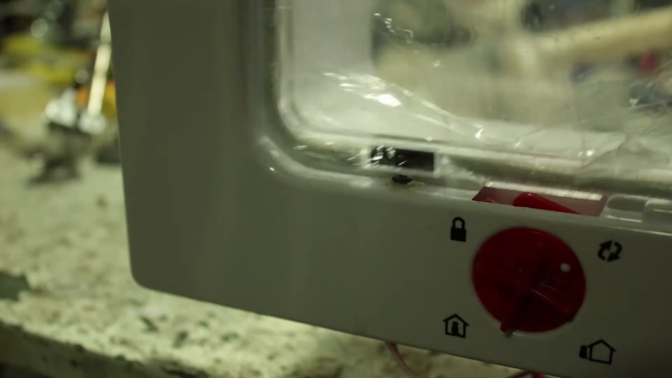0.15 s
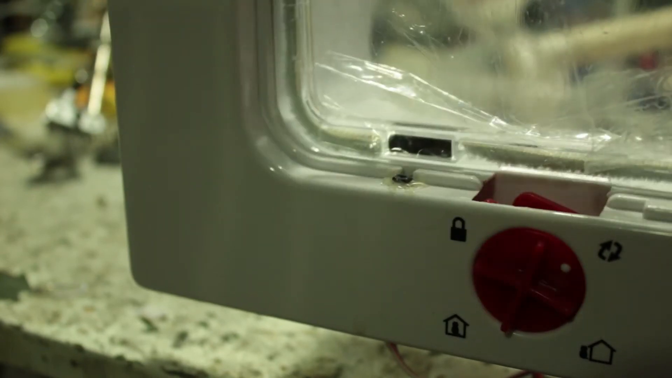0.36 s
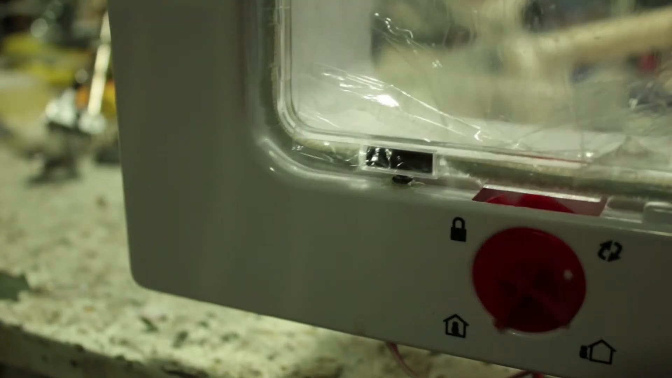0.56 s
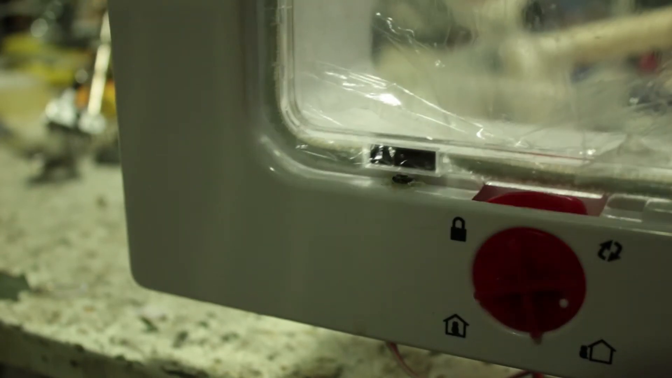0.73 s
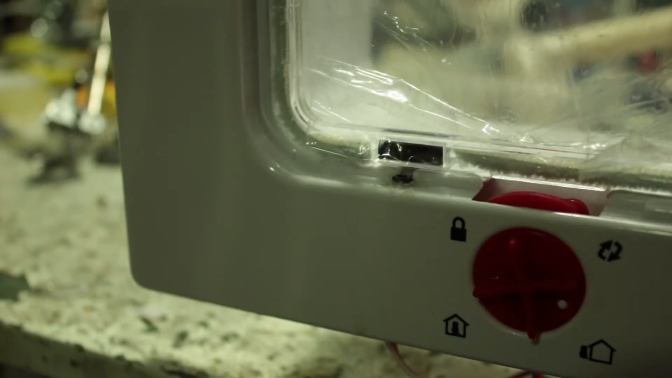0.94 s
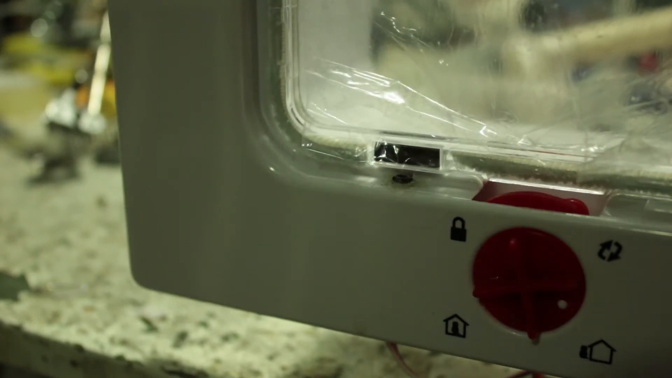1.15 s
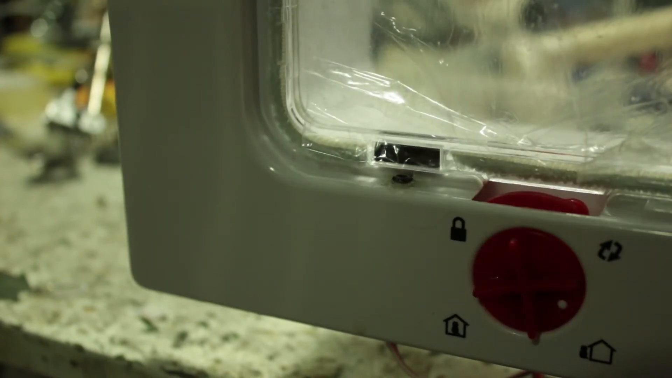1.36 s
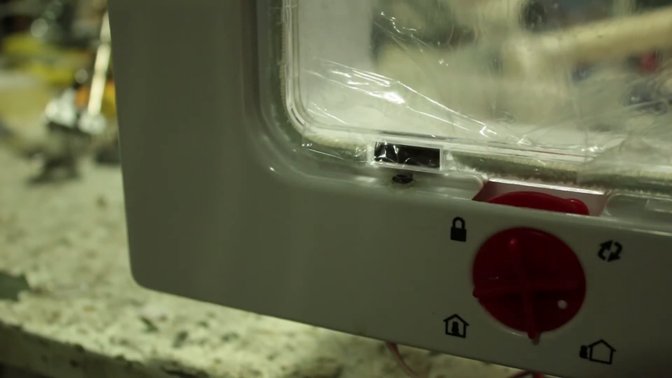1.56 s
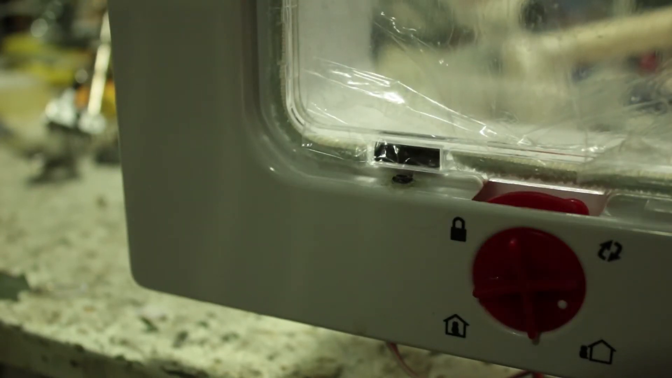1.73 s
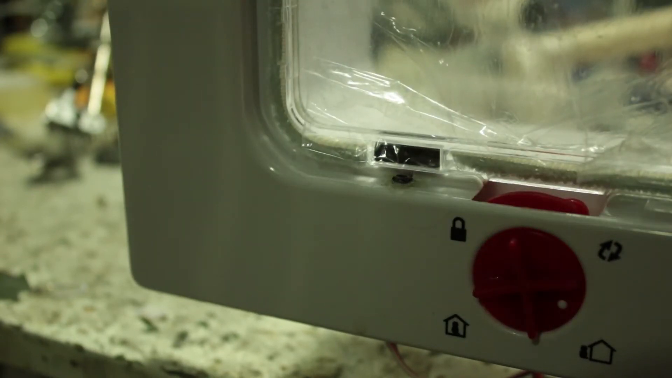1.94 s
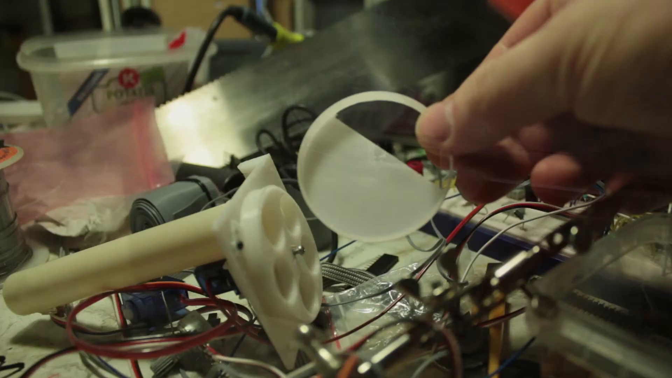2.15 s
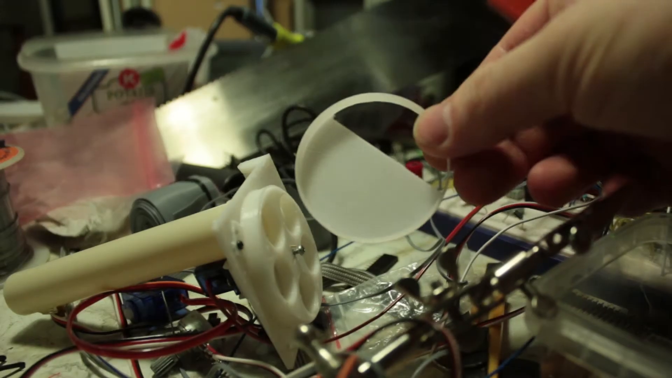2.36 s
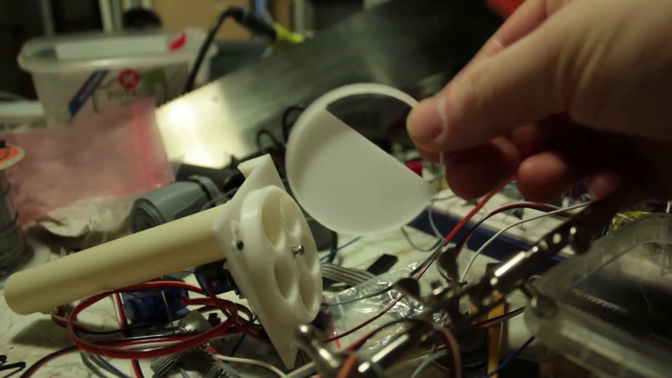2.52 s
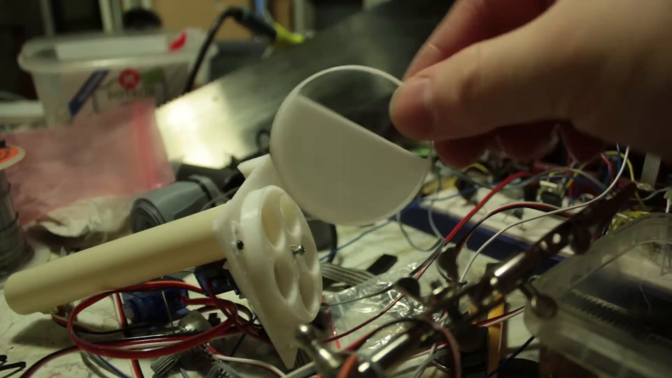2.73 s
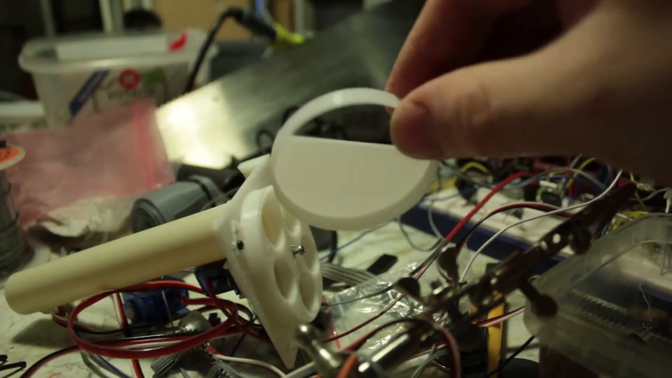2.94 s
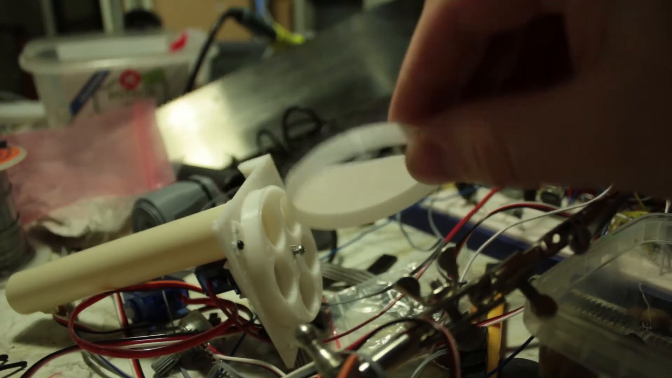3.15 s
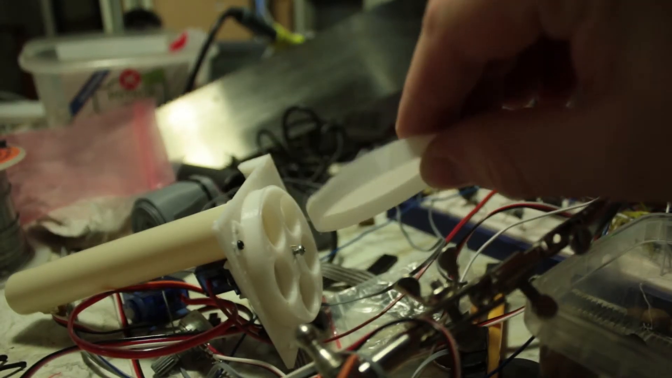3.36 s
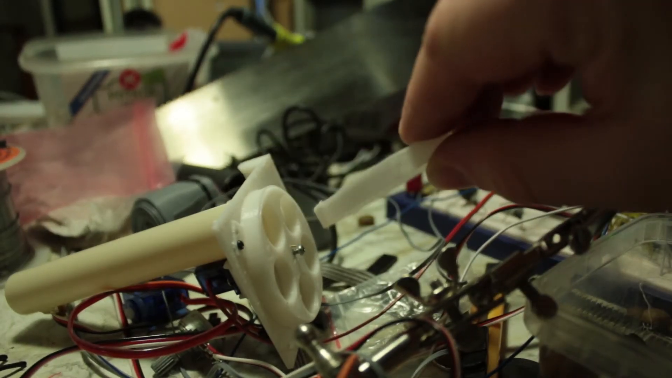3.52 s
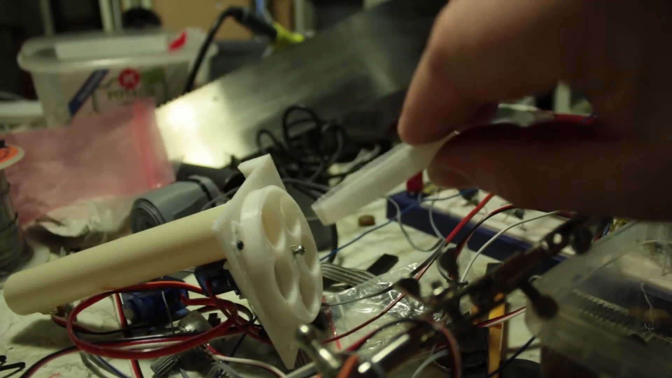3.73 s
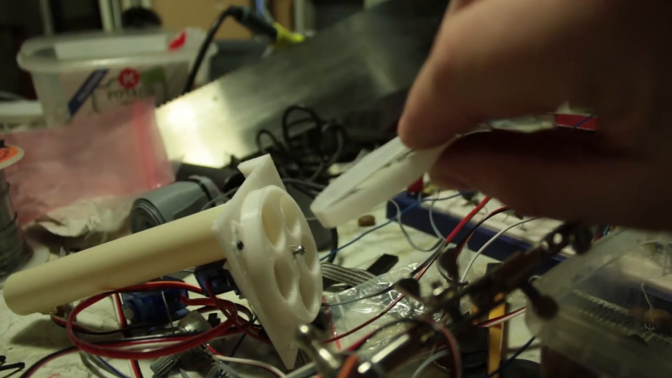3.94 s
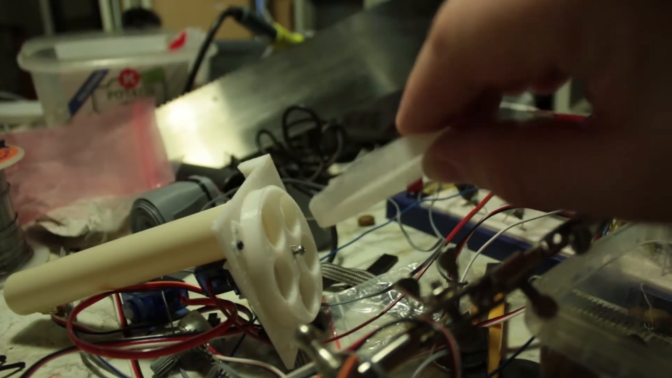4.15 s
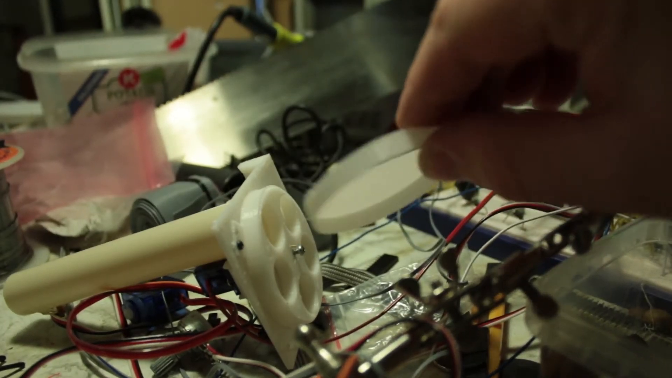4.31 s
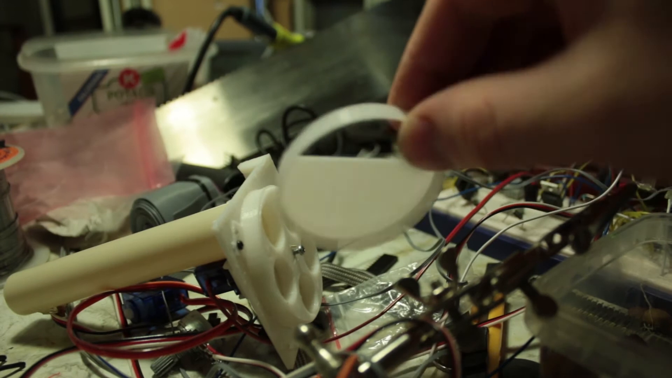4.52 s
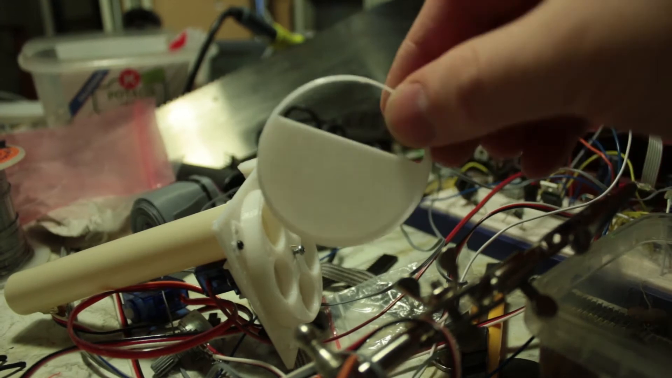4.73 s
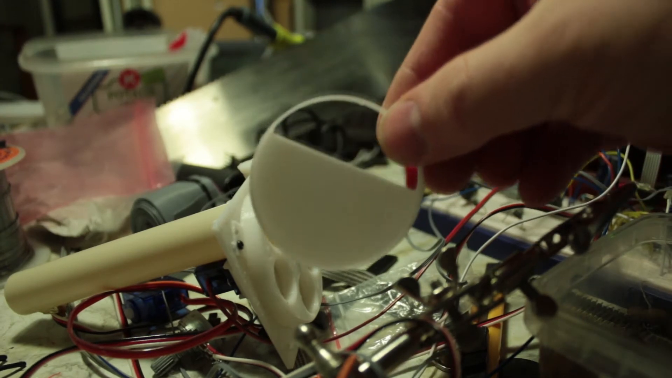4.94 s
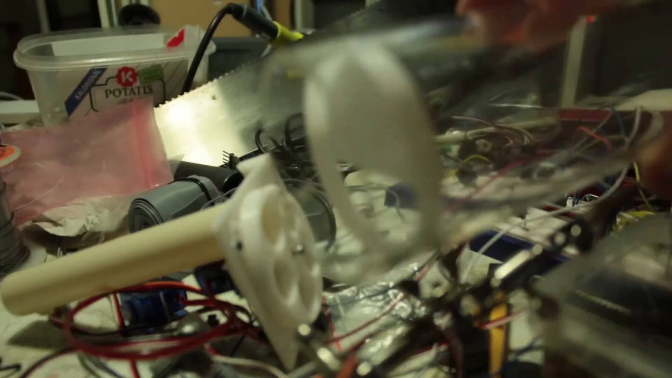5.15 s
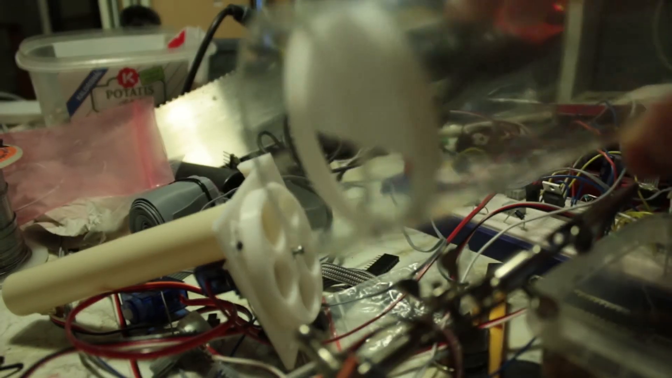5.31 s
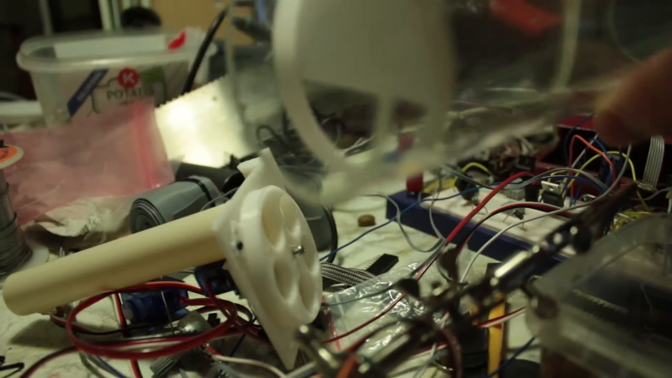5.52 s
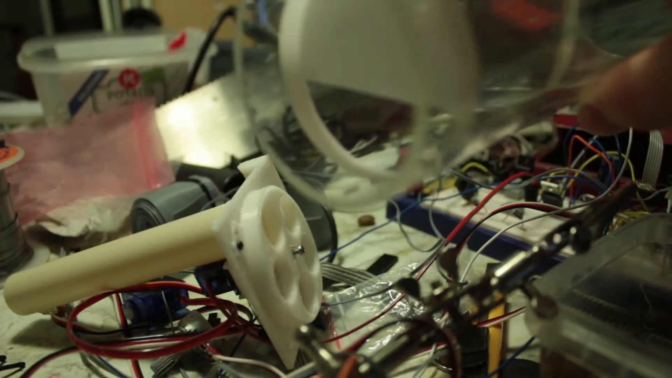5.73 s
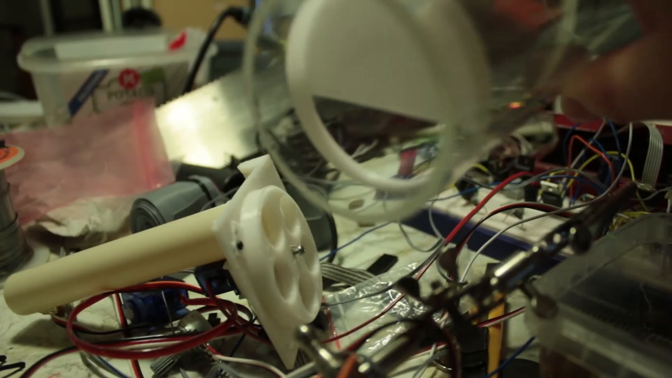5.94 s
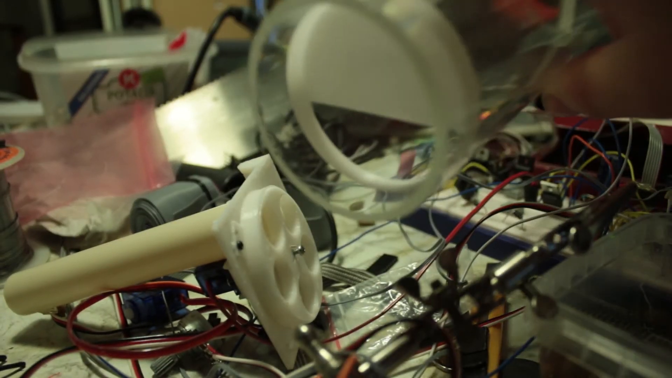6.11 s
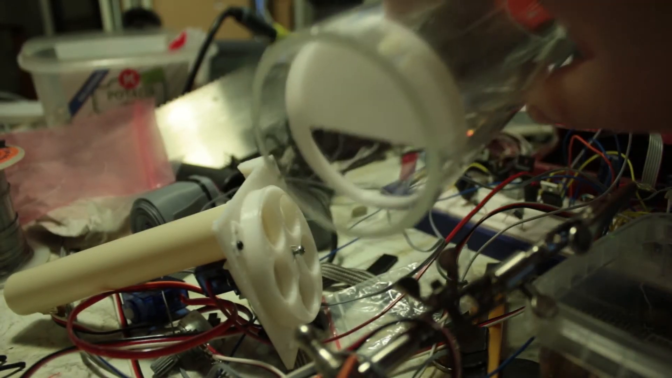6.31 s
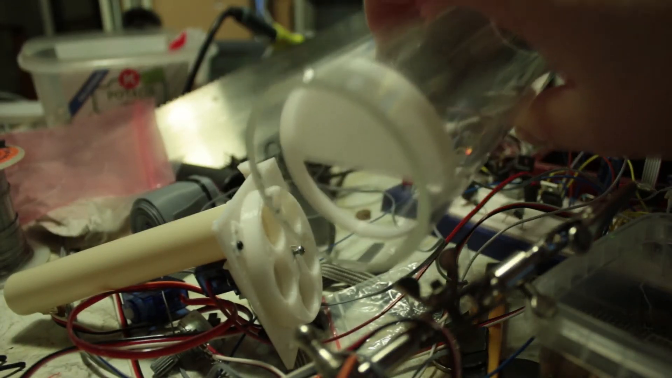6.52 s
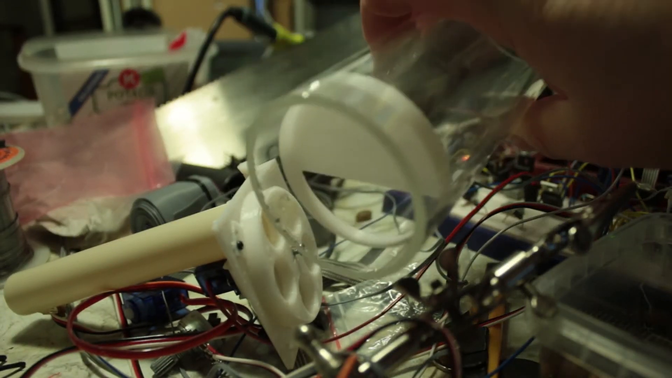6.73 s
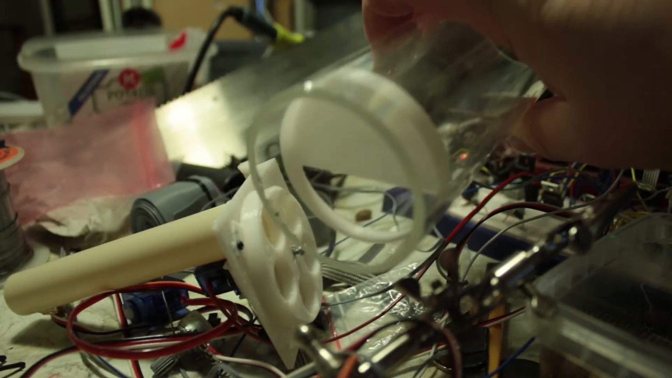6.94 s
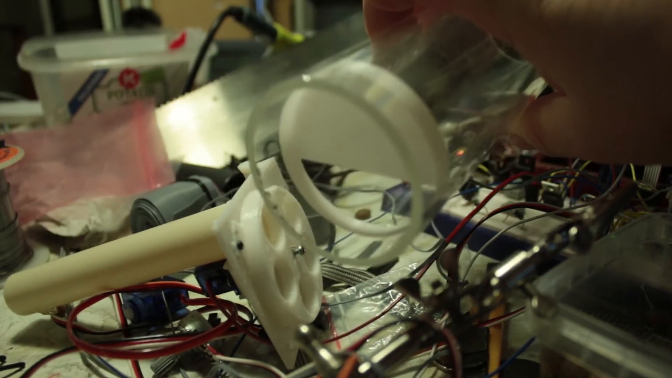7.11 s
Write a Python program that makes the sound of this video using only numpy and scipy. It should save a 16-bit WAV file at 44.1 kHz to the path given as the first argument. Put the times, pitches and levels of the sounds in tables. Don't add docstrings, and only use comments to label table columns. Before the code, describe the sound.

Very close to the microphone, a tiny servo whirs in a short burst, pauses, then revs again and drives a plastic latch into its stop with sharp clacks. Quiet humming room follows. After two seconds the camera's focus motor chatters in short dry rattles, with soft body thuds and light knocks, ending sparsely over faint hiss.

```python
import sys
import numpy as np
from scipy import signal
from scipy.fft import rfft, irfft, next_fast_len
from scipy.io import wavfile
from scipy.ndimage import uniform_filter1d

SR = 44100
rng = np.random.default_rng(int(sys.argv[2]) if len(sys.argv) > 2 else 0)


def dump_mix(stems):
    frames = np.atleast_2d(stems).T
    limited = np.clip(frames, -1, 1)
    pcm = np.round(limited * 32767).astype(np.int16)
    wavfile.write(sys.argv[1], SR, pcm)


def gain_from_db(level_db):
    decades = np.asarray(level_db, float) / 20
    return 10 ** decades


N = 320594
T = np.arange(N) / SR
GRID = np.arange(0, N / SR, 1 / 1000)
LONG = next_fast_len(N + 4096)
MOVE_S = 2.2

# frequency in Hz, width in Hz, level in dB.
HOUSING_MODES = [(952, 755, -12.5), (1850, 490, -5.5), (2313, 610, -6.5), (2858, 465, 3.5), (3098, 460, 3),
                 (3650, 250, -5), (4670, 1240, -20.5)]


def evened(x):
    return x / np.sqrt(np.mean(x ** 2) + 1e-20)


def read(points, hz):
    f, value = np.transpose(points)
    return np.interp(np.log(hz + 1), np.log(f + 1), value)


def add(mix, s, sound):
    part = mix[round(s * SR):][:len(sound)]
    part += sound[:len(part)]


def wander(size):
    return evened(uniform_filter1d(uniform_filter1d(rng.standard_normal(N), size), size))


def coloured(x, points):
    gain = gain_from_db(read(points, np.fft.rfftfreq(LONG, 1 / SR)))
    return evened(irfft(rfft(x, LONG) * gain, LONG)[..., :N])


def resonate(x, hz, width):
    r = np.exp(-np.pi * width / SR)
    return 2 * signal.lfilter([1 - r], [1, -r * np.exp(2j * np.pi * hz / SR)], x).real


def body(x, modes):
    return sum((-1) ** k * gain_from_db(db) * resonate(x, hz, w) for k, (hz, w, db) in enumerate(modes))


def housing(x, tint_db):
    out = 0
    for k, (hz, width, db) in enumerate(HOUSING_MODES):
        once = resonate(gain_from_db(db + tint_db[k]) * x, hz, width)
        out = out + (-1) ** k * resonate(once, hz, width)
    return out


def bursts(events):
    out, t = np.zeros(N), T[:SR // 8]
    for s, db, t60 in events:
        add(out, s, gain_from_db(db - 60 * t / t60) * np.minimum(t / 0.0012, 1))
    return out


def swells(rows, lift_db, fall_db_per_s):
    s, rise, hold, db = np.transpose(rows)[:4]
    age, rise = GRID[:, None] - s, np.maximum(rise, 1 / 500)
    level = db - lift_db * np.clip(1 - age / rise, 0, 1)
    level = level - 4000 * np.maximum(-age, 0)
    level = level - fall_db_per_s * np.maximum(age - rise - abs(hold), 0)
    lead, ticks = level.argmax(axis=1), np.arange(len(GRID))
    level_db = np.maximum(level[ticks, lead], -120)
    return np.interp(T, GRID, level_db), lead, age[ticks, lead]


def columns(tables):
    rows = []
    for table in tables:
        first, last = table[0], table[-1]
        rows += [(first[0] - 0.002, -120, *first[2:]), *table, (last[0] + 0.00071, -120, *last[2:])]
    s, *controls = np.transpose(rows)
    return [np.interp(T, s, c) for c in controls]


def ports(x, lag_s, lean):
    # frequency in Hz, share both microphones get alike.
    likeness = [(600, 1), (1500, 0.84), (3000, 0.63), (6000, 0.36)]
    hz = np.fft.rfftfreq(LONG, 1 / SR)
    first, other = rfft(x, LONG)
    share = np.clip(read(likeness, hz), 0, 1)
    half = np.exp(-1j * np.pi * hz * lag_s) * gain_from_db(read(lean, hz) / 2)
    pair = np.array([first * half, (share * first + np.sqrt(1 - share ** 2) * other) / half])
    return irfft(pair, LONG)[:, :N]


def room(x):
    # frequency in Hz, t60 in seconds.
    decay = [(200, 0.17), (1500, 0.11), (5000, 0.28), (12000, 0.069)]
    hz, t, z = signal.stft(rng.standard_normal((2, SR // 2)), SR, nperseg=128)
    tail = signal.istft(z * gain_from_db(-60 * t / read(decay, hz)[:, None]), SR, nperseg=128)[1]
    return signal.fftconvolve(x[None], tail / np.linalg.norm(tail[0]), axes=1)[:, :N]


def air():
    # frequency in Hz, level in dB.
    first_place = [(35, -52), (60, -15), (91, -14.5), (124, -3), (146, -8.5), (346, -10.5), (389, -10.5),
                   (480, -12.5), (553, -8.5), (784, -15.5), (1140, -13.5), (1340, -20), (1440, -17.5),
                   (16000, -29)]
    second_place = [(35, -29), (60, -11.5), (127, -6.5), (149, -3.5), (238, -4.5), (330, -7.5), (579, -8.5),
                    (698, -11), (1010, -11.5), (1110, -14.5), (1340, -14), (1470, -16), (6730, -21.5),
                    (16000, -29)]
    # frequency in Hz, left-right likeness.
    air_likeness = [(60, 0.54), (180, 0.74), (550, 0.53), (1650, 0.066), (4970, -0.19), (15000, -0.66)]
    # frequency in Hz, level in the first place in dB, in the second in dB.
    hum_tones = [(49.3, -73, -73), (124, -86, -93), (192, -73.5, -69), (243.5, -80, -72), (299, -96, -72.5)]
    second = np.clip((T - MOVE_S) / 0.27 + 0.5, 0, 1)
    hz = np.fft.rfftfreq(LONG, 1 / SR)
    same = np.clip(read(air_likeness, hz), 0, 1)
    out = np.zeros((2, N))
    for colour, db, share in ((first_place, -56.5, 1 - second), (second_place, -56, second)):
        both, left, right = rfft(rng.standard_normal((3, LONG)))
        pair = np.sqrt(same) * both + np.sqrt(1 - same) * np.array([left, right])
        noise = irfft(pair * gain_from_db(read(colour, hz)), LONG)[:, :N]
        out += gain_from_db(db - 2.0) * np.sqrt(share) * noise / np.std(noise.mean(0))
    for f, a_db, b_db in hum_tones:
        level_db = a_db + (b_db - a_db) * second + 2.0 * wander(size=3000)
        out += np.sqrt(2) * gain_from_db(level_db) * np.sin(2 * np.pi * (f * T + rng.random()))
    beat = np.exp(2.0 * (np.cos(2 * np.pi * 8.68 * (T - 1.04)) - 1))
    throb_hz = 530 + 45 * beat + 5 * wander(size=500)
    throb = evened((0.5 + beat) * np.sin(2 * np.pi * np.cumsum(throb_hz) / SR))
    return out + gain_from_db(-64.5) * (1 - second) * throb


def knocks():
    # start in seconds, peak in dB, frequency in Hz, t60 in seconds.
    knock_events = [(0.032, -39, 173, 0.38), (.06, -41, 590, 0.099), (.05, -47, 376, 0.27),
                    (0.249, -49.5, 167, 0.24), (0.545, -32.5, 329.5, 0.07), (.55, -40.5, 381, 0.17),
                    (.545, -42, 713, 0.17), (0.547, -43.5, 167.9, 0.27), (0.812, -40.5, 166, 0.5),
                    (.81, -37.5, 312, 0.12), (0.93, -51, 3620, 0.079), (4.001, -46, 165, 0.28),
                    (4.408, -36, 184.6, 0.22), (4.408, -37.5, 282, 0.14), (5.137, -41.5, 616, 0.13),
                    (5.155, -54, 420, 0.6), (5.137, -66.5, 1850, 0.89), (5.247, -35, 167.4, 0.16),
                    (5.621, -48, 184, 0.14), (5.921, -50, 183, 0.6), (6.21, -52, 573, 0.028),
                    (6.704, -42, 460, 0.036)]
    out, t = np.zeros(N), T[:SR // 2]
    for s, db, hz, t60 in knock_events:
        blur = np.clip(hz / 1200, 0, 1)
        width = 0.41 * hz
        cluster = evened(resonate(resonate(rng.standard_normal(len(t)), hz, width), hz, width))
        ring = (1 - blur) * np.sin(2 * np.pi * hz * t) + 1.9 * blur * cluster
        add(out, s, gain_from_db(db - 60 * t / t60) * np.minimum(t / 0.0011, 1) * ring)
    return out


def slide():
    # start in seconds, rise in seconds, hold in seconds, level in dB.
    hand_strokes = [
        (1.95, 0.042, 0.056, -46),
    ]
    # frequency in Hz, level in dB per Hz.
    friction = [(470, -37), (800, -12), (1460, -8), (1880, -1), (2050, -2.5), (4570, -1), (9330, -2),
                (16000, -16)]
    level_db = swells(hand_strokes, lift_db=16, fall_db_per_s=260)[0]
    return gain_from_db(level_db + 0.73 * wander(size=50)) * coloured(rng.standard_normal((2, N)), friction)


def steps():
    # start in seconds, rise in seconds, hold in seconds, rattle in dB, bright share in
    # dB.
    focus_steps = [(0.207, .025, 0.015, -46, -5), (.375, .034, .002, -61, -8),
                   (2.222, 0.023, .012, -41.5, -13.5), (2.344, 0.027, 0.018, -48, -13),
                   (2.473, 0.029, 0.011, -43, -11.5), (2.647, 0.021, .002, -50.5, -11),
                   (2.761, 0.024, 0.0093, -52.5, -16), (2.924, 0.033, .003, -52, -15),
                   (3.061, 0.02, 0.01, -41, -14.5), (3.179, 0.027, 0.0056, -44, -13),
                   (3.304, 0.018, 0.024, -32.5, -8.5), (3.467, 0.019, 0.013, -38, -13),
                   (3.592, 0.023, .005, -32.5, -11.5), (3.676, 0.019, 0.0033, -32, -9.5),
                   (3.817, .029, .002, -41, -11.5), (3.965, 0.03, 0.0023, -35.5, -13.5),
                   (4.102, .02, 0.018, -45.5, -12.5), (4.221, 0.018, .025, -37.5, -10),
                   (4.386, 0.017, 0.014, -36.5, -9.5), (4.559, 0.02, 0.01, -48, -20),
                   (4.679, .012, 0.027, -45, -12), (4.802, 0.033, .002, -52.5, -20),
                   (5.213, 0.016, 0.038, -34.5, -9), (5.301, 0.021, 0.0088, -34.5, -9),
                     (5.443, 0.012, 0.021, -35.5, -9.5), (5.597, 0.015, 0.021, -36.5, -9),
                     (5.764, 0.0075, 0.023, -40, -9), (5.886, 0.014, 0.019, -40.5, -9.5),
                     (6.016, 0.031, .002, -50, -16), (6.801, 0.013, 0.026, -40.5, -11),
                     (6.938, .027, .002, -51, -17), (7.064, 0.029, .002, -48, -11),
                     (7.187, .022, 0.014, -52.5, -20)]
    main = np.array(focus_steps)
    s, rise, _, db, bright_db = main.T
    settling = np.transpose([s, rise, 0.059 - rise, db - 14, bright_db])
    rows = np.vstack([main, settling])
    fall_db_per_s = 750 + 12 * (-37 - rows[:, 3])
    rattle_db, lead, age = swells(rows, 16, fall_db_per_s)
    start_db, late_db, lag_s = -24, -6.5, 0.061
    thud_db = start_db + (late_db - start_db) * np.clip(age / lag_s, 0, 1)
    tint_db = 2 * rng.standard_normal((len(rows), len(HOUSING_MODES)))[lead].T
    return rattle_db, *[np.interp(T, GRID, c) for c in (rows[lead, 4], thud_db, *tint_db)]


def focus_motor():
    # start in seconds, peak in dB, bright share in dB.
    jolts = [(2.7616, -25.5, -14), (3.3047, -22.5, 0), (3.474, -19.5, -3.5), (3.598, -22.5, -0.5),
             (3.9751, -29, -7), (4.228, -20.5, -6), (4.3904, -22.5, -1.5), (4.555, -28.5, -3.5),
             (4.806, -37, 8.5), (5.2217, -35.5, 7), (5.768, -25, -6), (5.8928, -24.5, -6), (6.8074, -29, 2)]
    # frequency in Hz, level in dB per Hz.
    bright_colour = [(2060, -52), (3500, -1.5), (5220, -9.5), (5800, -7.5), (6550, -10), (8650, -15.5),
                     (9940, -10.5), (12600, -16.5), (14000, -27)]
    snap_colour = [(900, -35), (1600, 2), (3500, 2), (5000, -6.5), (8000, -17)]
    # frequency in Hz, width in Hz, level in dB.
    thud_modes = [(191, 107, 5), (420, 1600, -11.5)]
    rattle_db, bright_db, thud_db, *tint_db = steps()
    engaged = np.ones(N)
    for s, *_ in jolts:
        add(engaged, s - 1 / 64, -np.ones(SR // 64))
    effort = engaged * gain_from_db(rattle_db)

    coil_per_s = 260
    turns = np.cumsum(coil_per_s * gain_from_db(2.5 * wander(size=150))) / SR
    kicks = np.diff(np.floor(turns), prepend=0) * gain_from_db(4.0 * rng.standard_normal(N))
    chatter = evened((0.56 + np.exp(-(turns % 1) / 0.84)) * rng.standard_normal((2, N)))
    drive = 0.72 * evened(kicks) + 1.58 * chatter

    jolt = bursts([(s, db - 9, 0.02) for s, db, _ in jolts])
    reference = np.std(housing(drive[0, :SR], np.zeros(len(HOUSING_MODES))))
    rattle = housing(effort * drive + jolt * chatter, tint_db) / reference

    shine = effort * gain_from_db(np.clip(bright_db, -40, -3))
    shine = shine + bursts([(s, db - 22.5 + share_db, 0.05) for s, db, share_db in jolts])
    bright = shine * coloured(0.3 * evened(kicks) + chatter, bright_colour)
    bright += bursts([(s, db - 17, 0.018) for s, db, _ in jolts]) * coloured(chatter, snap_colour)

    push = rng.standard_normal(N)
    thud = body(effort * gain_from_db(thud_db) * push, thud_modes) / np.std(body(push[:SR], thud_modes))
    powered = uniform_filter1d(1. * (rattle_db > -65) * (T > MOVE_S), size=5000)
    drone = gain_from_db(-60.5 + 2.0 * wander(size=3000)) * powered * np.sin(2 * np.pi * 78 * T)
    return rattle + bright, thud + drone


def clacks():
    # start in seconds, peak in dB, t60 in seconds.
    clack_events = [
        (0.0313, -39, 0.14),
        (0.5866, -15.5, 0.076),
        (0.7414, -12.5, 0.14),
        (0.786, -9.5, 0.15),
    ]
    # frequency in Hz, level in dB per Hz.
    clack_colour = [(710, -46), (1200, -23), (1680, -4), (2590, -18), (6230, -3.5), (8720, -10),
                    (12700, -5), (16000, -13)]
    return gain_from_db(-12.0) * bursts(clack_events) * coloured(rng.standard_normal((2, N)), clack_colour)


def servo():
    # time in seconds, motor effort in dB, latch drag in dB.
    strokes = [
        [(0.0, -19, -49), (0.024, -23, -56), (0.045, -22, -39), (0.085, -25, -31.5), (0.118, -25, -37.5),
         (0.21, -53, -64)],
        [(0.566, -41, -48), (0.586, -25, -34.5), (0.646, -19, -47.5), (0.686, -25, -57), (0.722, -23, -31),
         (0.782, -30, -31), (0.796, -22.5, -28), (0.85, -49.5, -46.5), (0.92, -57, -54)],
    ]
    # time in seconds, tooth rate of the first gear pair in Hz, whine in dB.
    spins = [
        [(0, 2595, -27), (.008, 2015, -38), (.024, 1992, -35), (.033, 2207, -27.5), (.043, 2420, -29.5),
         (.056, 2810, -38), (.1, 2425, -42), (.13, 2320, -55)],
        [(.572, 2240, -46), (.587, 2480, -34), (.6, 2640, -28), (.614, 2890, -24), (.644, 2900, -22),
         (.655, 2530, -25), (.666, 2195, -29), (.676, 1952, -46), (.7, 1610, -57)],
    ]
    # multiple of the tooth rate, level in dB.
    partials = [(1, -11), (2, 0), (3, -8), (5, -16)]
    # frequency in Hz, width in Hz, level in dB.
    case_modes = [(3430, 1400, -9.5), (5200, 890, 14), (5850, 800, 1.5), (6300, 540, 0)]
    # frequency in Hz, level in dB per Hz.
    scrape_colour = [(180, -41), (300, -12), (387, -4.5), (474, -15.5), (680, -2.5), (806, -14), (1140, -1),
                     (1390, -6.5), (2100, 3), (3800, 4), (4940, -43), (8360, -120)]
    brush_colour = [(3530, -32.5), (6000, 1.5), (7370, -3.5), (8030, -2.5), (14800, -8.5), (16000, -10)]
    ring_db, scrape_db = columns(strokes)
    hiss_db = ring_db - 9 + 0.27 * np.maximum(scrape_db + 54, 0)
    whine_db, mesh_hz = columns([[(s, db, hz) for s, hz, db in spin] for spin in spins])
    teeth = np.cumsum(mesh_hz * (1 + 0.018 * wander(size=45))) / SR
    shaft = np.cos(2 * np.pi * teeth / 12)

    whine = 0
    for k, db in partials:
        tone = np.cos(2 * np.pi * k * teeth + [[0], [-np.pi / 2]])
        whine = whine + gain_from_db(db + 4.5 * wander(size=160)) * tone
    whine = evened((1 + 0.45 * shaft) * whine)

    grit = gain_from_db(1.8 * shaft + 2.2 * wander(size=60)) * rng.standard_normal((2, N))
    grain_level = gain_from_db(1.6 * np.minimum(rng.exponential(1, N), 3))
    grain_hits = rng.random(N) < 7000 / SR
    grains = grain_level * grain_hits * rng.standard_normal((2, N))
    scrape = gain_from_db(scrape_db - 1.0) * coloured(grains, scrape_colour)
    hiss = gain_from_db(hiss_db + 1.5) * coloured(grit, brush_colour)
    moving = ring_db > -100
    case_ring = gain_from_db(ring_db - 5.0) * evened(body(grit, case_modes))
    return case_ring + gain_from_db(whine_db) * whine + moving * (scrape + hiss)


def scene():
    # frequency in Hz, left minus right in dB.
    servo_lean = [(500, .3), (2000, -.5), (5000, -1.3), (12000, -3)]
    no_bass = signal.butter(2, 250, "high", fs=SR)
    latch = signal.lfilter(*no_bass, servo() + clacks() + slide())
    rattle, thud = focus_motor()
    near = ports(latch, 5e-5, servo_lean) + gain_from_db(-9) * room(latch[0])
    inner = 1.204 * ports(rattle, 9e-5, [(100, 0), (9000, 1.3)]) + gain_from_db(-21.5) * room(rattle[0])
    return 1.364 * near + inner + thud + knocks() + air()


def roll_off(x):
    return signal.sosfilt(signal.butter(12, 16140, fs=SR, output="sos"), x)


def record(dry):
    band_limit = signal.firwin(255, 15850, fs=SR)
    limited = signal.oaconvolve(dry, band_limit[None], "same")
    return roll_off(limited)


dry = scene()
out = record(dry)
dump_mix(out)
```